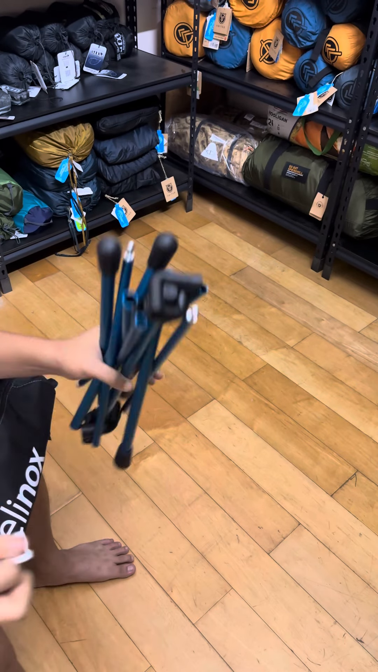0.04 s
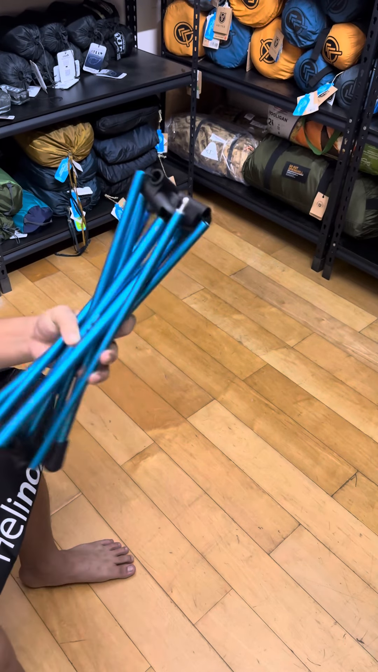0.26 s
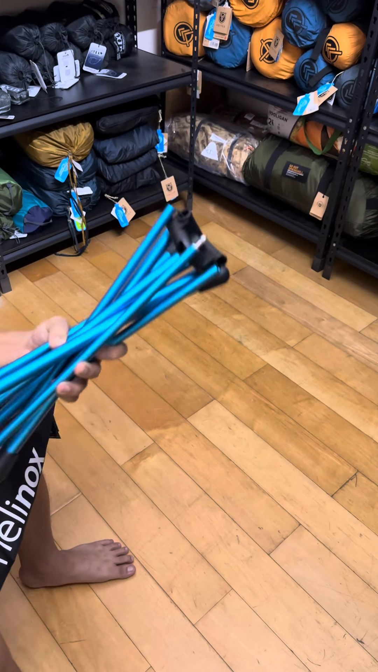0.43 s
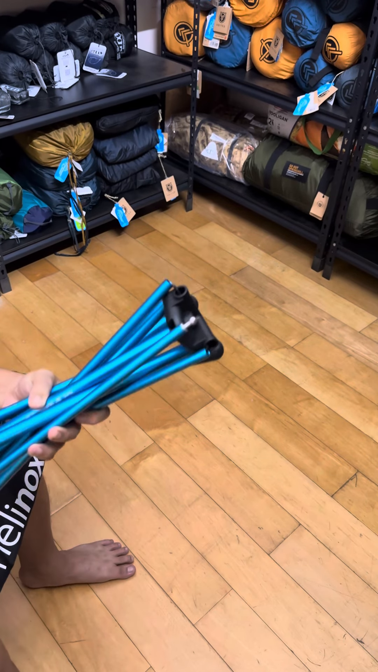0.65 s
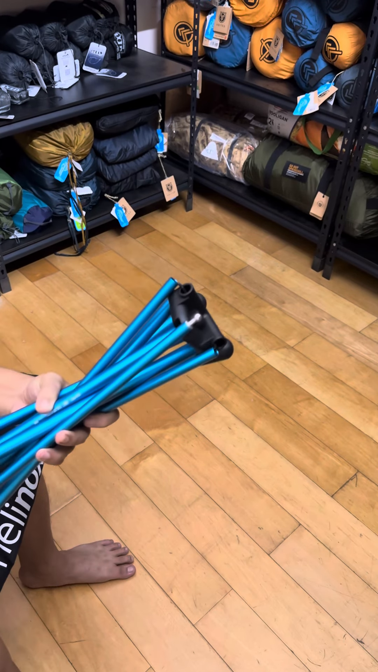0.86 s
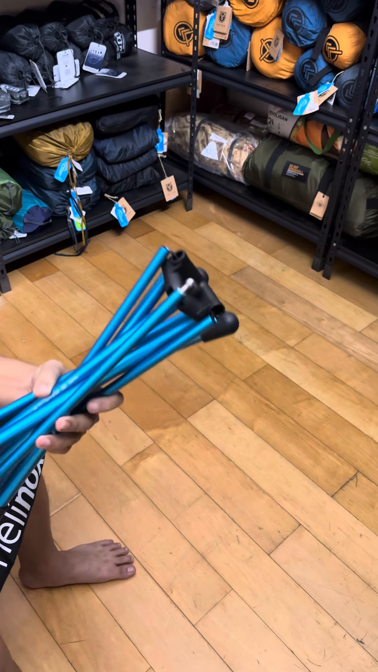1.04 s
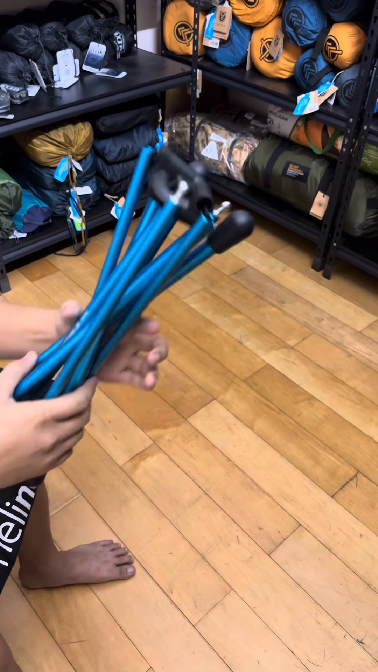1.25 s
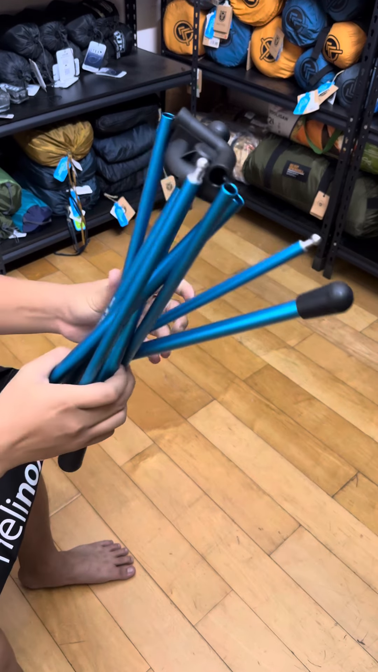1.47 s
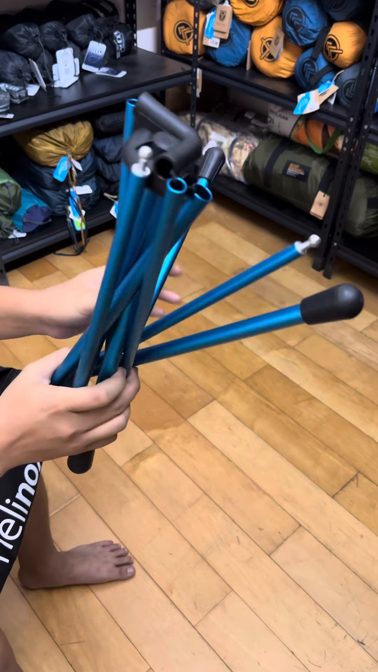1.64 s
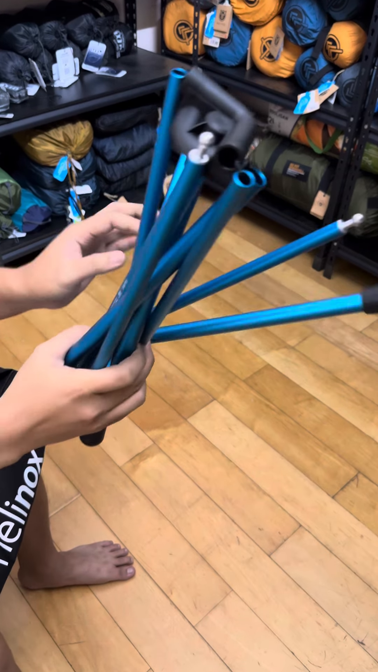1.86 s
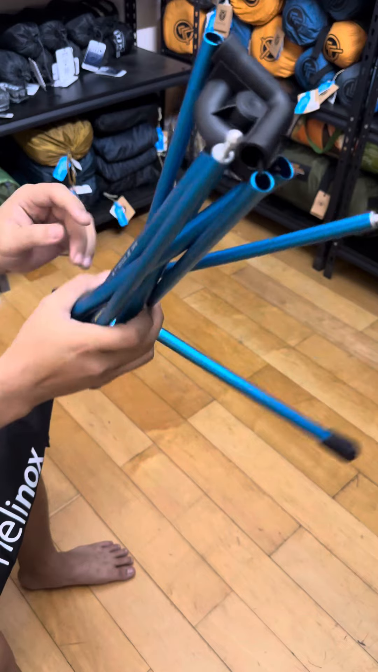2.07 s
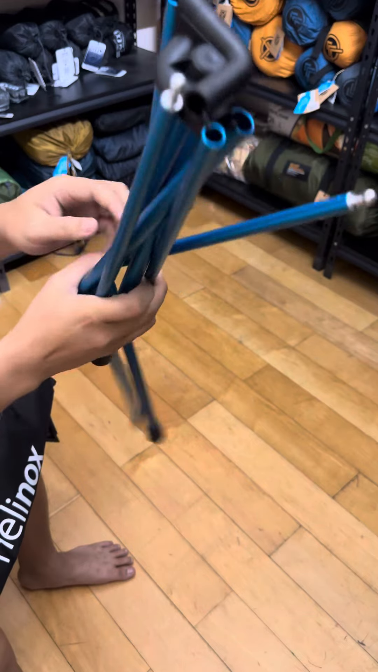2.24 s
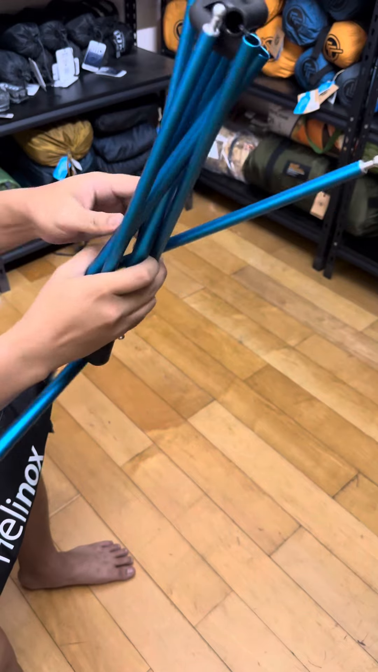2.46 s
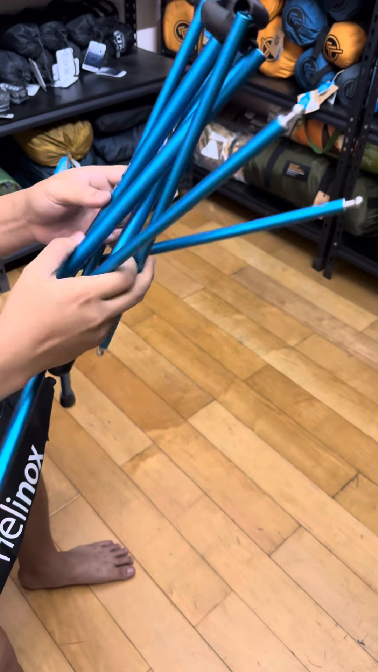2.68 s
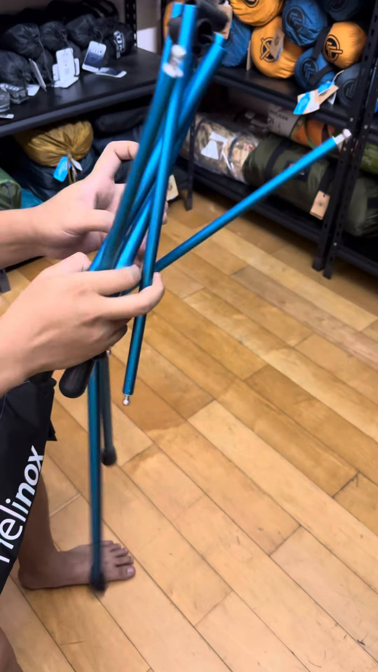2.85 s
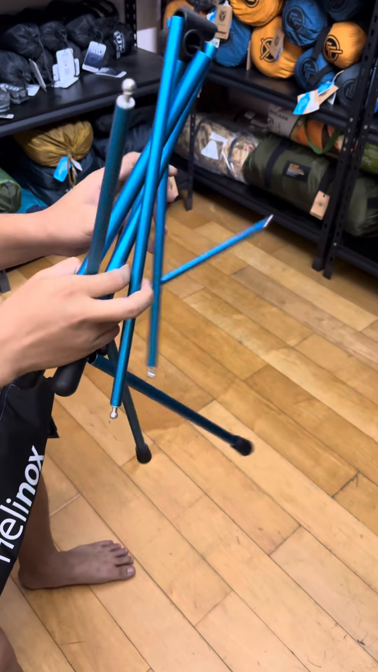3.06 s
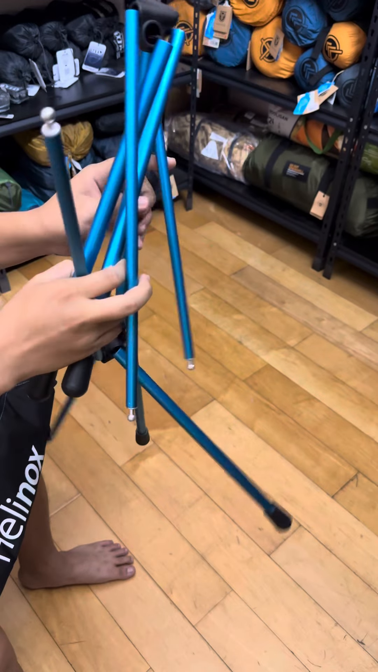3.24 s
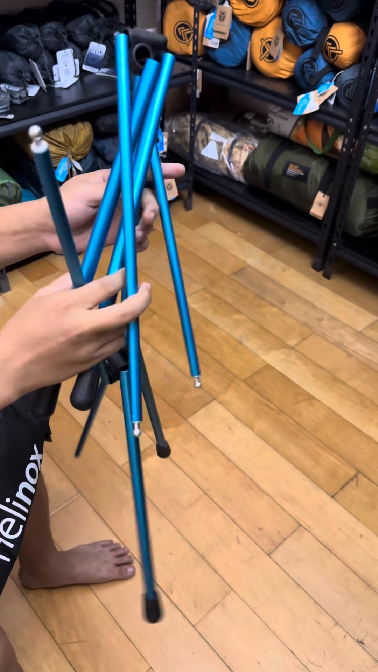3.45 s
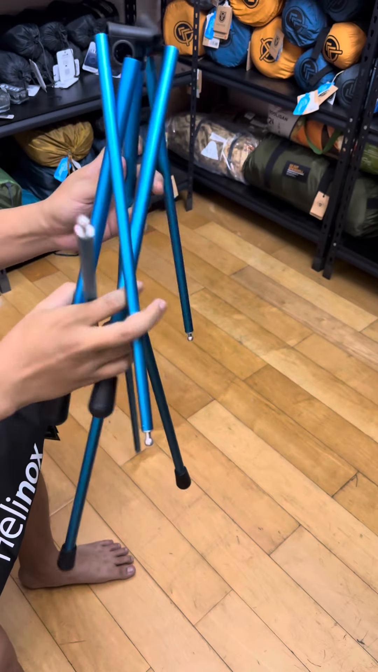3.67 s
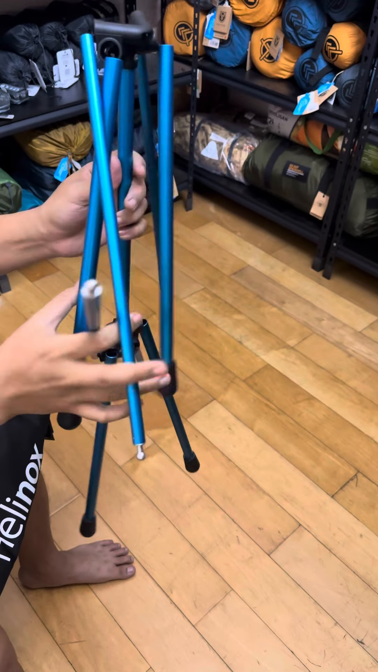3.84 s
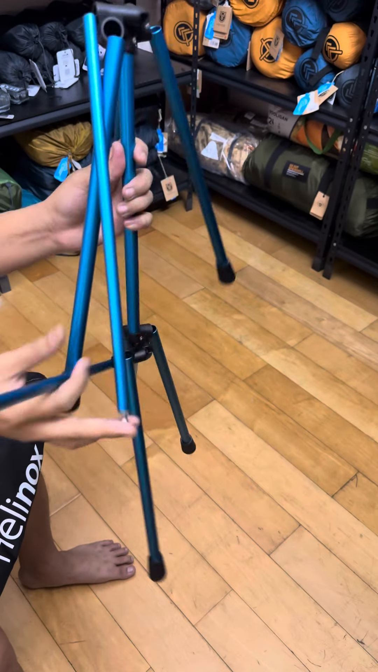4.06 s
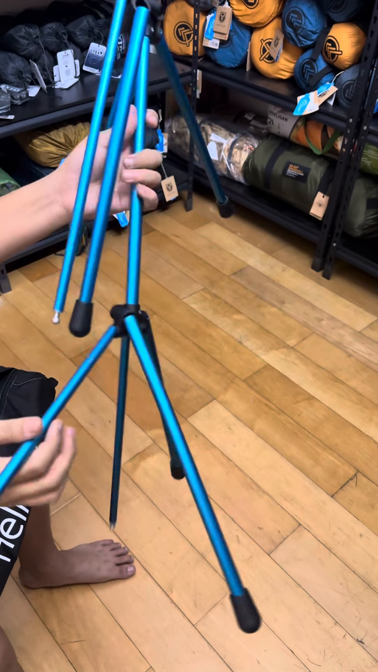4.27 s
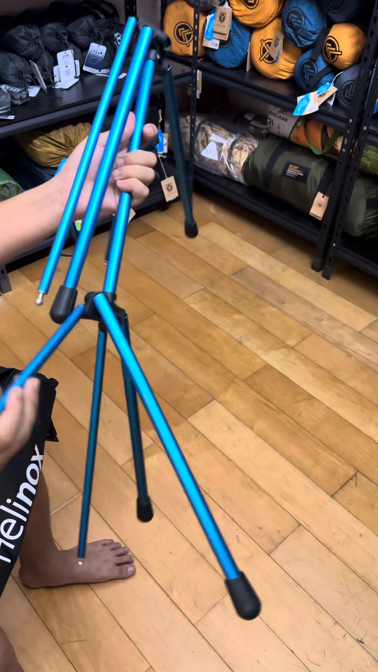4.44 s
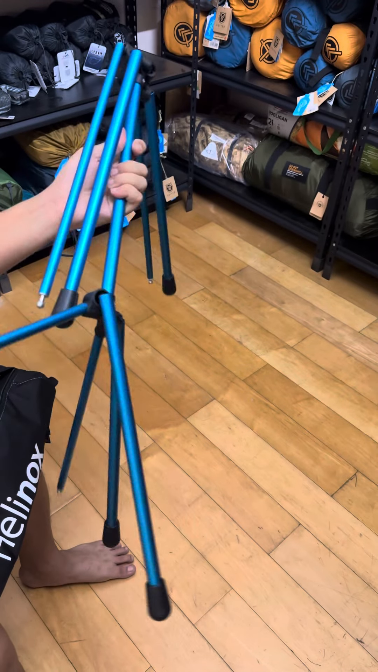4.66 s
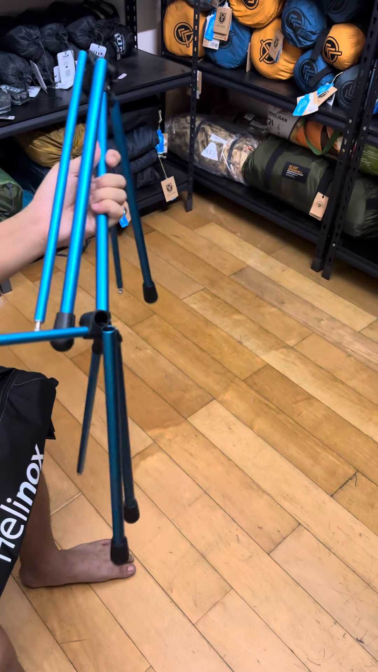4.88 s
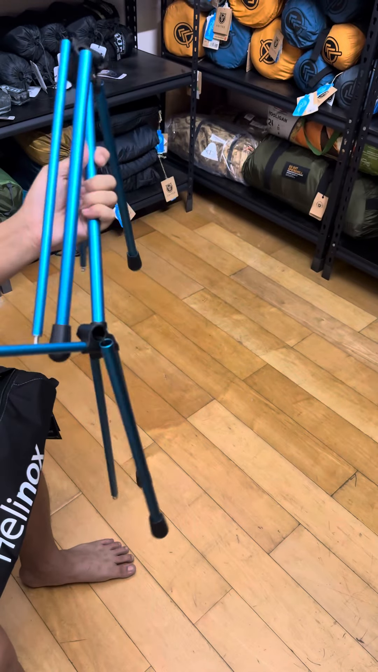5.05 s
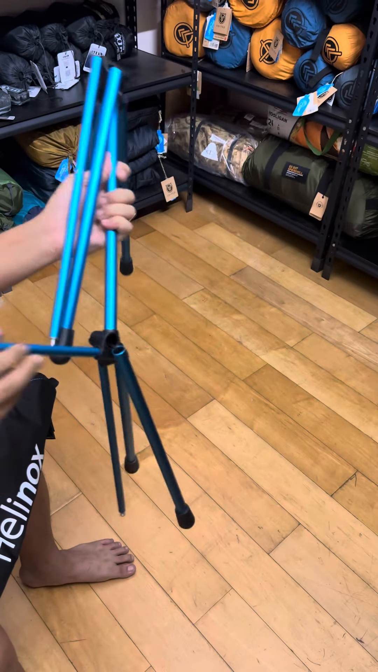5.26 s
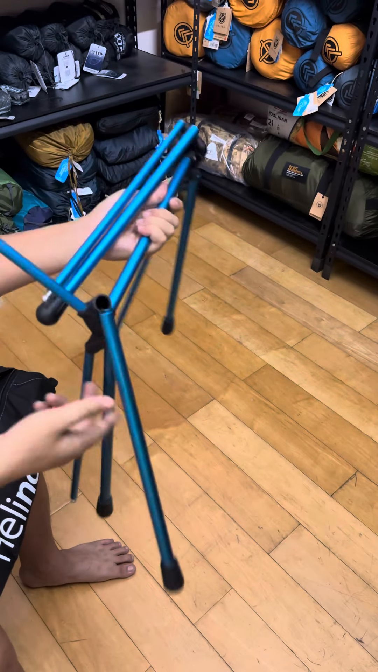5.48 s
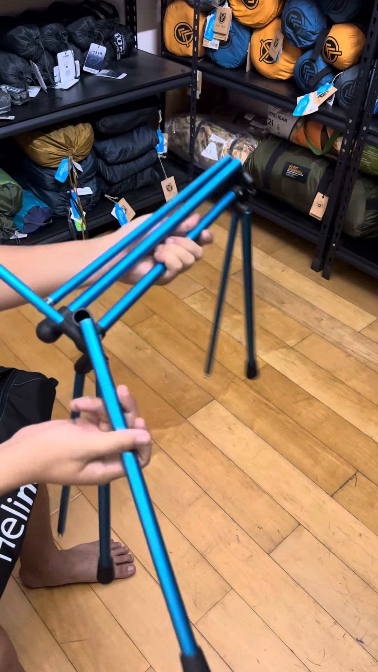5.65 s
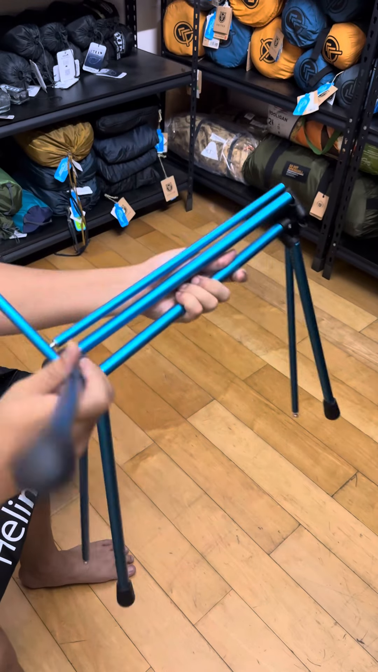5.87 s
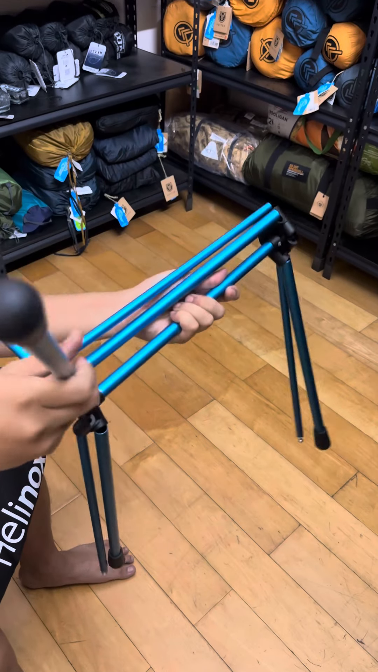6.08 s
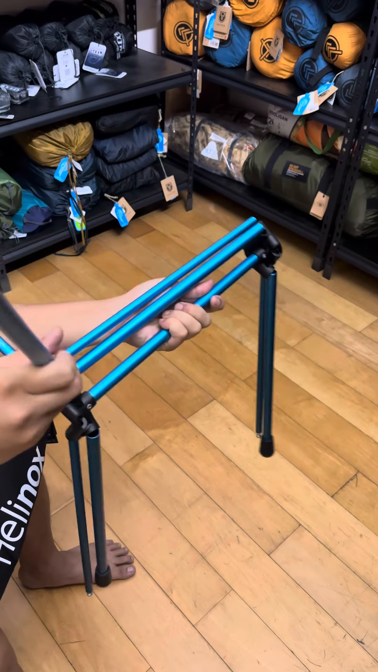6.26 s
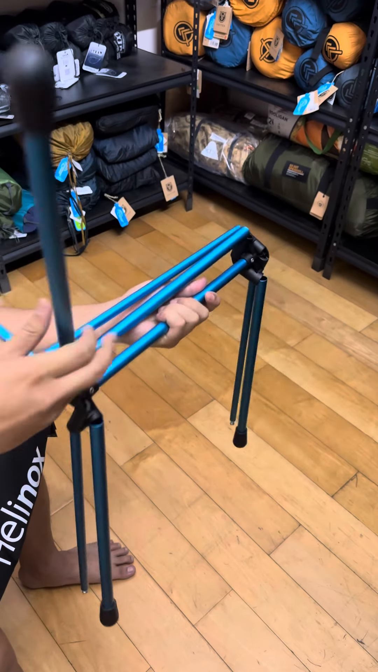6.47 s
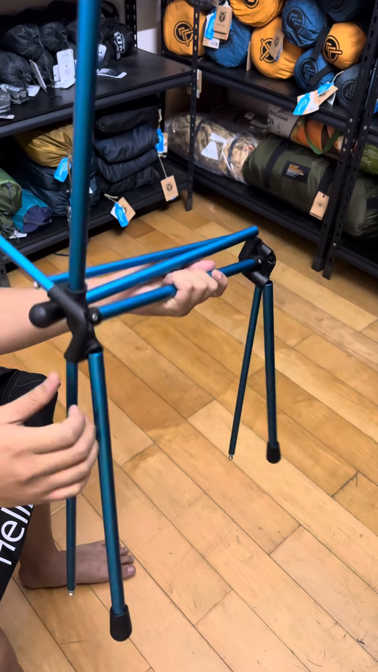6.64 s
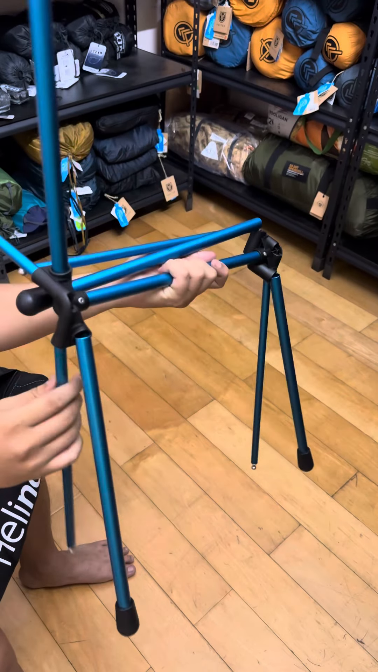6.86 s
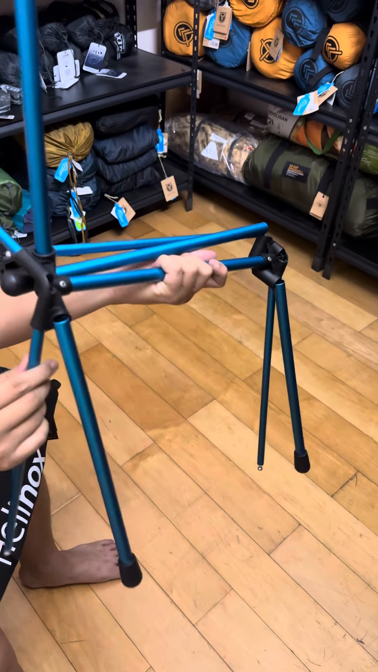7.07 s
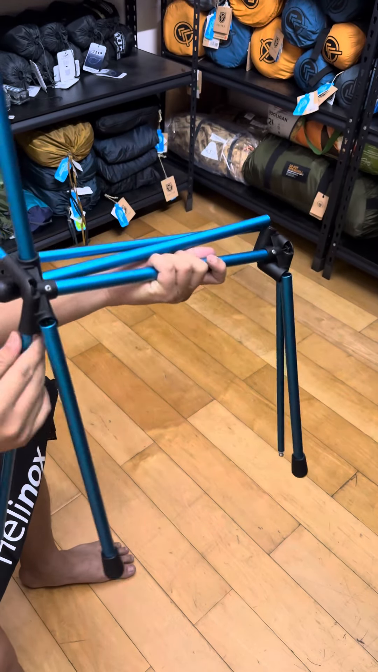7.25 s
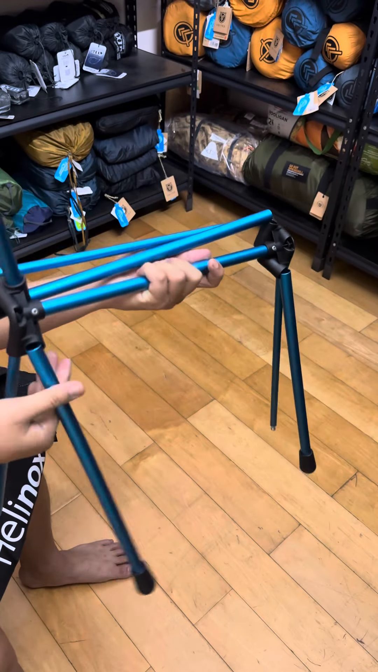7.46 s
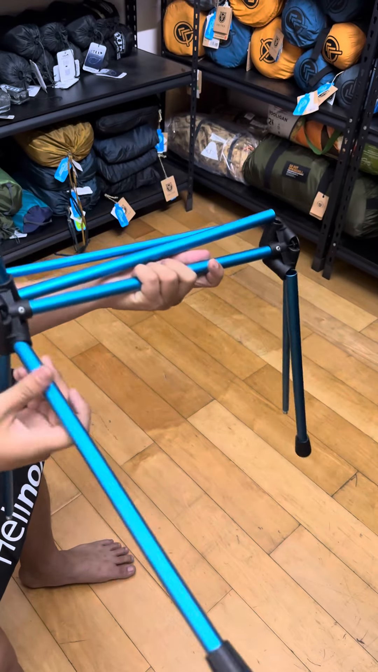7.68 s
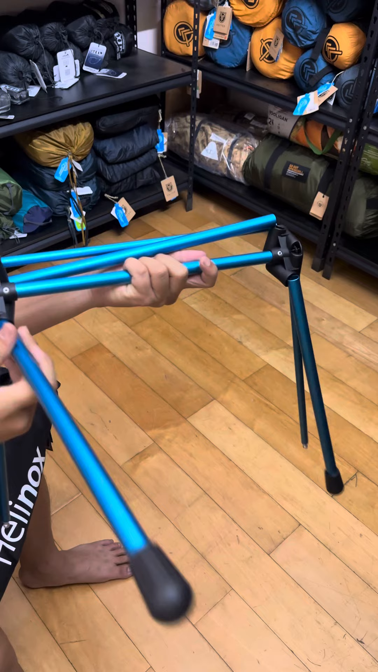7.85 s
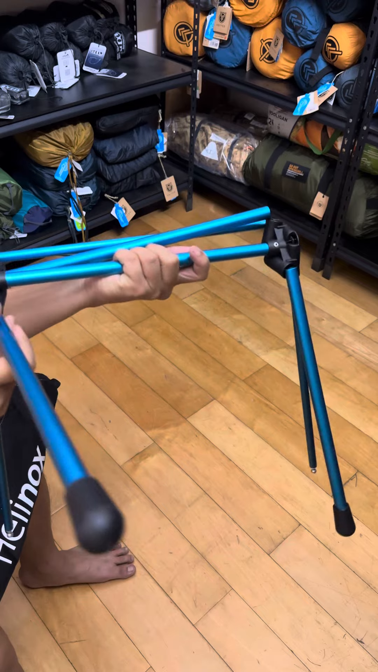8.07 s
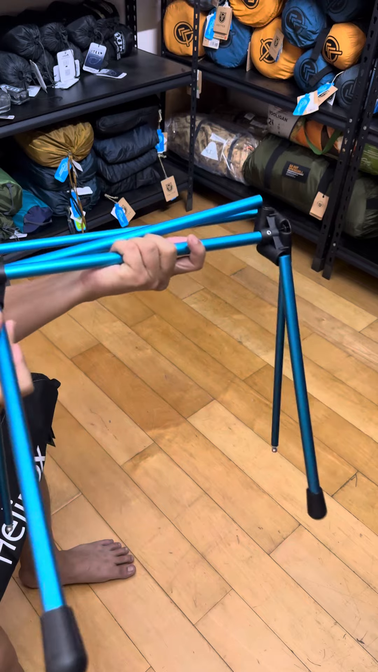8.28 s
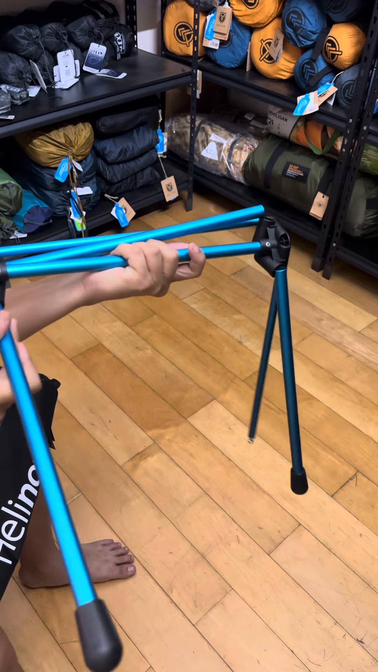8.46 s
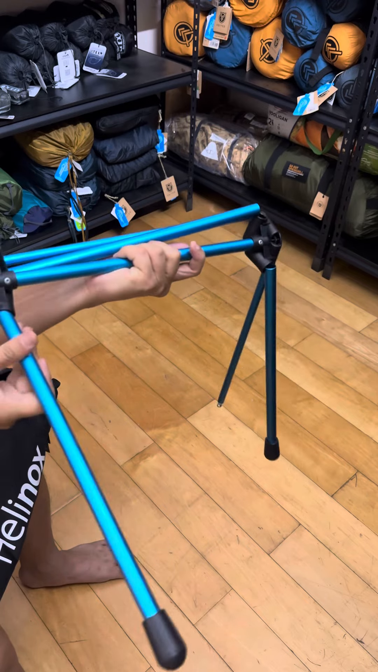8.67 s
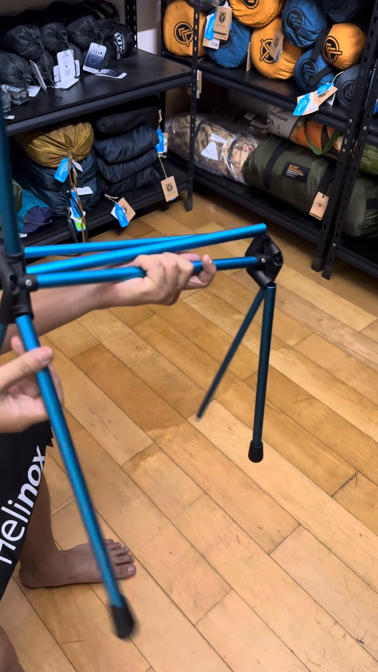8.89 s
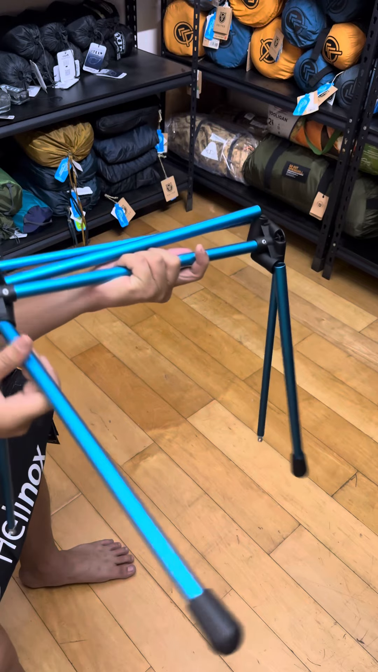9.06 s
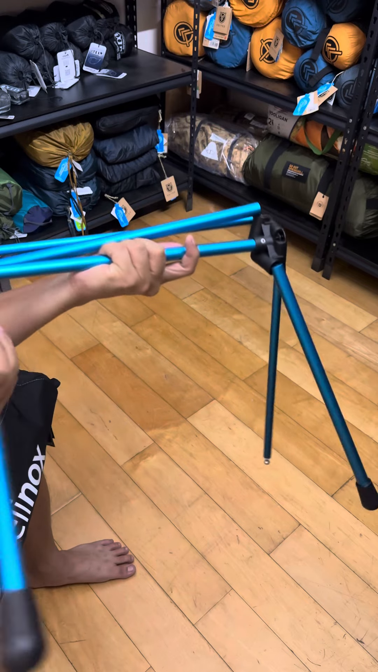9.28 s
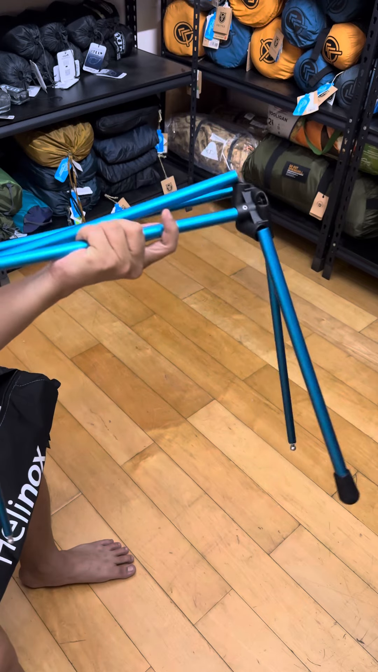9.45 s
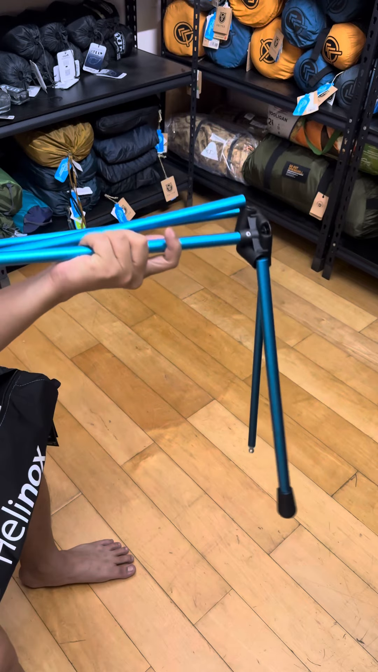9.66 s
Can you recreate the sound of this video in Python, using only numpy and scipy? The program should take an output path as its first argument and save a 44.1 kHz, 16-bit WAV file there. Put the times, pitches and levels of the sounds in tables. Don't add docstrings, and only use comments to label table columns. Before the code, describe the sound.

Dry, bright metallic clicks and clinks from a bundle of hollow poles, heard very near in a small room with short echoes. Busy rattling comes first, then isolated snaps, some preceded by a quick rising scrape of squeezed air. Skin and cord rub along the tubes between hits. Low ventilation noise and a distant engine sit beneath, and the ending is nearly quiet.

```python
import sys
import numpy as np
from scipy import signal
from scipy.fft import rfft, irfft, next_fast_len
from scipy.io import wavfile
from scipy.ndimage import uniform_filter1d

SR = 44100
rng = np.random.default_rng(int(sys.argv[2]) if len(sys.argv) > 2 else 0)


def to_wav(sig):
    pcm = np.clip(np.atleast_2d(sig), -1, 1) * 32767
    pcm = np.round(pcm).astype(np.int16)
    wavfile.write(sys.argv[1], SR, pcm.T)


def boost(x):
    u = np.asarray(x, float) / 20
    return 10 ** u


N = 428652

# (time [s], peak [dB], knock re peak [dB], edge re peak [dB], note [Hz])
SNAPS = [(1.1973, -14, -21, -2.5, 3900), (1.2238, -19.5, -16, -5, 5200), (1.2293, -18.5, -14, 0.5, 3600),
         (1.262, -21.5, -20, -26, 2710), (1.41, -20.5, -17, -10, 2610), (1.414, -20.5, -16.5, -16.5, 3380),
         (1.9298, -13.5, -16, -11.5, 3300), (1.931, -18.5, -18, -14.5, 2300),
         (1.9305, -20, -15, -11.5, 5000), (2.0516, -23.5, -12, -10.5, 3250),
         (2.122, -20.5, -20.5, -5.5, 6380), (2.163, -18, -18, -13, 2900),
         (2.5806, -21.5, -10.5, -1.5, 4800), (2.582, -22.5, -15.5, -6.5, 2500),
         (2.8541, -22.5, -10.5, -15, 6040), (2.855, -23, -9, -20, 2300), (2.9717, -7.5, -14, -15, 3200),
         (3.2817, -9.5, -11.5, -11, 1150), (3.283, -12.5, -21.5, -7, 3400), (4.0925, -29, -1.5, -2.5, 4600),
         (4.1728, -19.5, -8.5, -0.5, 4570), (4.1749, -20, -15, -7, 2300), (4.2281, -17.5, -19, -5, 3000),
         (5.1586, -13, -13, -9, 2980), (5.594, -24, -15, 0.5, 4430), (6.3565, -9, -13.5, -7, 5400),
         (6.3569, -8, -24, -9.5, 1450), (7.154, -28.5, 1, -3, 2170), (7.1971, -17, -7, -22, 2200),
         (8.2368, -7, -15, -12.5, 2560)]


def colour(x, table):
    size = next_fast_len(x.shape[-1])
    hz, db = np.transpose(table)
    bin_hz = np.arange(size // 2 + 1) * SR / size
    gain = boost(np.interp(np.log(bin_hz + 1), np.log(np.maximum(hz, 1)), db))
    return irfft(rfft(x, size) * gain, size)[..., :x.shape[-1]]


def band(x, lo_hz, hi_hz):
    return signal.sosfilt(signal.butter(2, [lo_hz, hi_hz], "bandpass", fs=SR, output="sos"), x)


def unit(x):
    return x / np.sqrt(np.mean(x ** 2))


def curve(table):
    s, *columns = np.transpose(table)
    return [np.interp(np.arange(N) / SR, s, c) for c in columns]


def walk(rate_hz):
    k = int(SR / rate_hz)
    steps = np.repeat(rng.standard_normal(N // k + 1), k)
    return 1.3 * uniform_filter1d(uniform_filter1d(steps, k), k)[:N]


def humps(start, end, top_db, rise, fall, floor_db):
    t = np.arange(0, N, 64)[:, None] / SR
    early = rise * np.maximum(start - t, 0)
    late = fall * np.maximum(t - end, 0)
    db = np.max(top_db - early - late, axis=1)
    return np.maximum(np.repeat(db, 64)[:N], floor_db)


def air():
    # (frequency [Hz], level [dB])
    vent_colour = [(25, -24.5), (42, -0.5), (100, 5), (160, -4.5), (250, -0.5), (410, -1.5), (500, -10),
                   (800, -12), (1300, -22.5), (2500, -26), (4000, -33), (6300, -50), (8500, -61.5),
                   (11000, -69.5)]
    # (frequency [Hz], level [dB])
    vent_side = [(60, -25.5), (110, -21), (200, -20.5), (380, -11.5), (700, -0.5), (1200, 0), (1750, -9),
                 (2600, 0.5), (3800, -3), (4700, 2), (8000, -6), (13000, 11.5)]
    # (time [s], level [dB])
    passes = [(.38, 6), (1.5, 4), (2.49, 3), (3.36, 3.5), (3.74, 6), (4.41, 4.5), (4.87, 4), (5.52, 3.5),
              (6.0, 7), (7.09, 5.5), (7.469, 3), (8.15, 6.5), (8.8, 4), (9.6, 1)]
    noise = colour(rng.standard_normal((2, N)), vent_colour)
    noise[1] = colour(noise[1], vent_side)
    noise = noise * boost(-45.5) / np.sqrt(np.mean(band(noise[0], 130, 10000) ** 2))
    s, db = np.transpose(passes)
    swell_db = humps(s, s, db, rise=40, fall=38, floor_db=-1.5)
    spectrum, hz, out = rfft(noise), np.arange(N // 2 + 1) * SR / N, 0
    split_hz = np.r_[0, 45 * 2 ** np.arange(0, 4.5, 1 / 3), SR]
    for lo, hi in zip(split_hz[:-1], split_hz[1:]):
        move_db = 1.4 * walk(4) + swell_db * (hi < 135)
        out = out + boost(move_db) * irfft(spectrum * ((hz >= lo) & (hz < hi)), N)
    return out


def drone():
    # (time [s], pitch [Hz], level [dB])
    engine = [
        (1.2, 80.24, -73),
        (1.596, 76.7, -46.5),
        (2.478, 80.2, -40.5),
        (2.618, 77.8, -44),
        (2.678, 80.0, -56),
        (2.848, 80.6, -46.5),
        (2.884, 80.1, -46),
        (2.934, 82.1, -48),
        (3.0, 85.2, -65),
    ]
    hz, db = curve(engine)
    t = np.arange(N) / SR
    fade = np.clip(np.minimum(t - engine[0][0], engine[-1][0] - t) / 0.13, 0, 1)
    hum = np.sin(2 * np.pi * np.cumsum(hz) / SR)
    return np.sqrt(2) * boost(db) * fade * hum * np.array([[1], [.06]])


def room(x):
    # (centre [Hz], time to fall 60 dB [s], level [dB])
    echo_bands = [(477, 0.35, -2.5), (980, 0.19, 3), (2010, 0.42, -7), (4000, 0.33, -1), (7800, 0.36, -1),
                  (13000, 0.14, -9.5)]
    t = np.arange(int(.7 * SR)) / SR
    tail = 0
    for hz, t60, db in echo_bands:
        noise = band(rng.standard_normal((2, len(t))), hz / 1.87, min(hz * 1.427, 18000))
        tail = tail + boost(db) * noise * 1000. ** (-t / t60)
    tail = tail * np.clip((t - .003) / 0.0013, 0, 1)
    return boost(-30.0) * signal.fftconvolve(x[:1], tail, axes=1)[:, :N]


def rubbing():
    # (time [s], level [dB])
    slips = [(1.19, -32.5), (1.35, -36), (2.09, -30), (2.54, -39), (2.79, -45.5), (2.95, -44.5),
             (3.3, -40.5), (4.17, -61.5), (5.17, -38.5), (6.36, -31), (7.17, -60), (8.39, -36), (9.04, -52)]
    # (time [s], level [dB])
    grip = [(0, -72.5), (1.1, -75.5), (1.5, -57), (1.95, -63), (2.3, -44.5), (2.8, -49), (3.6, -56),
            (4.25, -72), (4.55, -68), (4.75, -68.5), (5.0, -83), (5.4, -78.5), (6.1, -64), (6.66, -57),
            (6.8, -85.5), (7.3, -50.5), (7.85, -74), (9.72, -71)]
    # (start [s], end [s], level [dB])
    strokes = [(0.595, 0.723, -47.5), (1.084, 1.303, -48), (1.4, 1.81, -57), (1.962, 2.05, -48),
               (2.124, 2.164, -34.5), (2.73, 2.822, -43), (3.0, 3.45, -56), (3.515, 3.85, -50.5),
               (3.83, 4.105, -45.5), (4.2, 4.326, -45), (4.7, 4.74, -63), (5.06, 5.125, -75),
               (7.2, 7.3, -54), (7.66, 7.707, -57), (8.77, 8.826, -59), (9.3, 9.33, -77)]
    grains = rng.standard_normal((2, N)) * boost(3 * np.minimum(rng.exponential(size=(2, N)), 5))
    s, db = np.transpose(slips)
    rub_db = humps(s, s, db, rise=253, fall=171.5, floor_db=curve(grip)[0])
    skin = unit(band(grains, 1400, 7800)) * boost(rub_db - 6.5 + 2.3 * walk(25))
    noise = rng.standard_normal((2, N))
    hiss = unit(band(band(noise, 12700, 14200), 12700, 15800))
    hiss = hiss + .5 * unit(band(noise, 15000, 15800))
    hiss = hiss + 0.11 * unit(band(noise, 3600, 13000)) + 0.26 * unit(band(noise, 1200, 5500))
    stroke_db = humps(*np.transpose(strokes), rise=900.5, fall=205, floor_db=-92.0)
    return skin + hiss * boost(stroke_db + 2.7 * walk(60))


def squeak():
    part = np.clip((np.arange(N) / SR - 4.9775) / 0.0155, 0, 1)
    arch = np.sin(np.pi * part ** 1.4)
    phase = 2 * np.pi * np.cumsum(1900 + 1100 * arch) / SR
    note = np.sin(phase) + 0.17 * np.sin(2 * phase)
    return boost(-41.0) * np.sin(np.pi * part) ** .5 * note * np.array([[1], [.4]])


def slides():
    # (start [s], from [Hz], to [Hz], level [dB], swell power [-])
    slide_table = [
        (3.268, 890, 2460, -33, 1.5),
        (5.084, 1590, 3420, -51, 0.45),
        (5.57, 4000, 9000, -52, 1.1),
        (6.31, 2493, 5040, -52.5, 1.2),
        (7.122, 1043, 14960, -28.5, 0.95),
        (7.156, 1178, 1495, -41, 0.062),
        (8.168, 996, 3300, -34, 3.3),
    ]
    out = np.zeros((2, N))
    for start, from_hz, to_hz, db, swell in slide_table:
        end = min(row[0] for row in SNAPS if row[0] > start)
        i, part = int(start * SR), np.linspace(0, 1, int((end - start) * SR))
        hz = from_hz + (to_hz - from_hz) * part ** 1.2
        phase = 2 * np.pi * np.cumsum(hz) / SR
        rough = unit(band(rng.standard_normal((2, len(part))), 40, 350))
        scrape = unit(band(rng.standard_normal((2, len(part))), 1500, 11000))
        note = np.sin(phase) + .7 * (to_hz < 8000) * np.sin(2.0 * phase)
        out[:, i:i + len(part)] += boost(db) * part ** swell * (rough * note + 0.37 * scrape)
    return out


def ring(modes, t, strength, detune):
    hz, db, t60 = np.transpose(modes)[:, :, None]
    decay = np.exp(-np.log(1000) * t / t60)
    return np.sum(strength * boost(db) * np.sin(2 * np.pi * hz * detune * t) * decay, axis=0)


def leg():
    # (frequency [Hz], level [dB], time to fall 60 dB [s])
    leg_modes = [(544, -22.5, .15), (1082, -38, .12), (1590, -16.5, .1), (1612, -25, .13), (2126, -38, .1),
                 (3052, -33, .2), (3203, -31, .2), (4700, -40, .2)]
    out, i = np.zeros(N), int(2.2825 * SR)
    out[i:i + SR // 2] = ring(leg_modes, np.arange(SR // 2) / SR, 1, 1)
    return out * np.array([[1], [-.4]])


def chinks():
    # (time [s], note [Hz], level [dB])
    chink_table = [(1.1528, 14780, -15), (1.1978, 14500, -19.5), (1.2297, 14300, -15.5),
                   (5.1588, 14490, -16), (6.357, 14200, -16), (8.2372, 14500, -17), (1.93, 14500, -8),
                   (2.0516, 15000, -23.5), (2.117, 13600, -2), (2.618, 14900, -25), (2.734, 14700, -18.5),
                   (2.9715, 13400, -22), (3.283, 8700, -14.5), (3.2825, 14100, -14), (3.291, 8800, -17.5),
                   (4.0934, 8900, -21), (4.1735, 9200, -10), (4.1729, 14100, -12), (4.2282, 13500, -12),
                   (4.2282, 9330, -17), (5.595, 8500, -27), (8.9817, 8400, -30)]
    t = np.arange(9000) / SR
    out = np.zeros((4, N + len(t)))
    for s, hz, db in chink_table:
        i = int(s * SR)
        rough = unit(band(rng.standard_normal(len(t)), 30, 250))
        fade = np.exp(-t / 0.0031) + boost(-16.5) * rough * np.exp(-t / .025)
        chink = boost(db) * np.sin(2 * np.pi * hz * t) * fade
        out[:, i:i + len(t)] += chink * np.array([[1], [1], [0], [.4]])
    return out[:, :N]


def all_contacts():
    # (time [s], peak [dB], edge re peak [dB], note [Hz], ring [dB])
    clinks = [(1.1529, -17, -2.5, 3220, -16), (1.2534, -21, -9, 4900, -22.5),
              (1.3531, -29.5, -1, 4630, -21), (1.3612, -27, -7, 4460, -26),
              (2.1167, -20.5, -0.3, 5540, -11), (2.1338, -26, -10, 5700, -25),
              (2.2835, -17, -16.5, 1430, -14), (2.4055, -25, -3, 4120, -20), (2.618, -24.5, -7, 2920, -20),
              (2.734, -23, -8, 2900, -21), (2.7426, -24, -9.5, 2580, -13), (2.8216, -26, -11, 2440, -12),
              (2.9657, -10, -25, 1420, -16), (3.4105, -30, -5.5, 3520, -34), (3.9365, -33, -5, 3510, -12.5),
              (4.2824, -26, -2.5, 6350, -14), (5.1827, -41.5, -14, 2970, -4.5),
              (5.837, -38.5, -14, 1254, -30), (5.837, -37.5, -12.5, 2800, -25),
              (7.447, -43, -25.5, 2280, -9), (8.2419, -17, -13.5, 2400, -13.5),
              (8.2375, -14, -11.5, 4500, -21), (8.255, -19.5, -4, 1570, -13),
              (8.2601, -13.5, -10, 3100, -5), (8.2866, -19, -16, 3153, -3), (8.9818, -33, 6, 1900, -22),
              (8.9819, -32, -0.5, 3400, -20), (8.994, -31.5, -0.5, 6000, -25),
              (1.1526, -18.5, -5, 5200, -27), (1.1885, -29, 0.5, 5200, -25), (1.4384, -39, -10, 3500, -25),
              (5.606, -35.5, -3, 3320, -25), (2.9685, -12, -15, 2250, -6), (2.977, -16.5, -8.5, 6500, -5),
              (3.288, -19.5, -6, 515, -25), (3.292, -18, 0, 2780, -24), (3.304, -22.5, -6.5, 947, -26),
              (6.3598, -11.5, -9, 3860, -23), (6.3597, -12, -17.5, 2280, -25)]
    # (time [s], peak [dB], edge re peak [dB], note [Hz])
    ticks = [(1.1674, -34.5, 6, 6700), (1.541, -38, -34, 2820), (1.6835, -32.5, -6, 2520),
             (1.73, -35, -30, 3000), (2.0724, -29, -5, 3350), (2.08, -31.5, -3, 2510),
             (2.4411, -28, -5.5, 4950), (2.6428, -26.5, -15, 1600), (2.6778, -29, -25, 4750),
             (2.7753, -28.5, -35, 3620), (2.8694, -28, -3, 6700), (3.515, -37.5, -4.5, 1810),
             (3.833, -47.5, -4, 2750), (4.0213, -45, -11, 1430), (4.1856, -25.5, -3, 5950),
             (4.2323, -18, -11, 2990), (4.9823, -48, -9, 2830), (5.1597, -15, -41, 1600),
             (6.12, -43.5, -6, 3080), (6.213, -28, 0.5, 5410), (6.2906, -34, -10, 5850),
             (6.6357, -38.5, 1, 6160), (7.4191, -42, -20, 3000), (7.494, -39, -26, 2200),
             (7.5781, -46, -4, 2990), (7.6505, -39.5, -15.5, 3240), (8.71, -43.5, -23, 1210),
             (8.9616, -40, -12, 2700), (9.356, -46.5, -24, 1195), (9.5406, -48, -12.5, 1280)]
    # (time [s], peak [dB], note [Hz])
    creaks = [(2.427, -29, 2400), (2.542, -40, 3040), (4.479, -43, 2040), (4.727, -46.5, 2440),
              (4.8903, -52, 2590), (5.447, -44.5, 2620), (5.498, -53, 2490), (6.0496, -55, 2710),
              (6.153, -47, 2090), (7.5552, -48, 1360), (7.722, -48.5, 2970), (8.8382, -42.5, 2470),
              (8.902, -49, 2620), (9.183, -42, 2950), (9.4983, -44, 2900), (9.577, -44, 2560),
              (9.6357, -48, 2380), (9.686, -44.5, 2920)]
    held_ring_db, tick_ring_db, creak_ring_db = -25.5, -22.5, -14.5
    creak_knock_db, creak_edge_db, creak_crack_db = -6, -8, -11

    def knock_db(hz):
        return -10 + 2 * np.log2(hz / 3000)

    rows = [(*row, held_ring_db, 0) for row in SNAPS]
    rows += [(s, db, knock_db(hz), edge, hz, ring_db, 0) for s, db, edge, hz, ring_db in clinks]
    rows += [(s, db, knock_db(hz), edge, hz, tick_ring_db, 0) for s, db, edge, hz in ticks]
    rows += [(s, db, creak_knock_db, creak_edge_db, hz, creak_ring_db, creak_crack_db)
             for s, db, hz in creaks]
    return rows


def crackle(t, rise_s, last_s):
    shape = np.minimum(t / rise_s, 1) * np.exp(-t / last_s)
    spectrum = rfft(rng.standard_normal(shape.shape) * shape)
    burst = irfft(spectrum / np.abs(spectrum), len(t)) * np.sqrt(shape)
    return burst / np.sqrt(np.sum(burst ** 2, axis=1, keepdims=True) / (last_s[0] * SR))


def contacts():
    # (frequency [Hz], level [dB], time to fall 60 dB [s])
    tube_modes = [(1745, -9, .1), (2248, -5, .14), (2630, -10, .07), (3129, 1, .3), (3168, -2, .24),
                  (3279, -1, .24), (4170, -8, .1), (4760, -11, .09), (5455, -13, .06), (6530, -10, .07),
                  (8700, -20, .03), (11500, -20, .08), (13300, -12, .1), (14400, -14, .1)]
    # (frequency [Hz], level [dB])
    frame_colour = [(1050, -0.5), (1500, 2), (3100, -1), (3550, -4), (4150, -1.2), (5000, -2.5),
                    (6500, 2.5), (8000, 1.5)]
    body_hz, body_follows, body_octaves = 2900, .75, .6
    t, long_t = np.arange(2400) / SR, np.arange(9000) / SR
    body, knock, edge, notes = np.zeros((4, 4, N + len(long_t)))
    for s, peak_db, knock_db, edge_db, hz, ring_db, crack_db in all_contacts():
        i = int(s * SR)
        here, long_here = slice(i, i + len(t)), slice(i, i + len(long_t))
        hard_s = 0.00033 + 0.0013 * boost(peak_db + 15.5) ** .5
        last_s = boost(-crack_db) * hard_s * np.array([[1], [1], [4.5], [.15]])
        burst = boost(peak_db + crack_db) * crackle(t, 0.00037 * boost(-crack_db), last_s)
        burst[2:] *= boost(-.08 * (peak_db + 15.0))
        centre = body_hz * (hz / body_hz) ** body_follows
        limits = centre * 2 ** (body_octaves * np.array([-1, 1]))
        body[:, here] += band(band(burst, *limits), *limits)
        knock[:, here] += burst * boost(knock_db)
        edge[:, here] += burst * boost(edge_db)
        toward = rng.choice([-1, 1])
        click = boost(peak_db + 2.0) * np.sin(2 * np.pi * hz * t) * np.exp(-t / 0.0024)
        notes[:, here] += click * np.array([[1], [.6 * toward], [.3], [.27]])
        chance = rng.standard_normal((2, len(tube_modes), 1))
        tube = ring(tube_modes, long_t, boost(2.5 * chance[0]), 1 + .002 * chance[1])
        tube = boost(1.206 * peak_db - 5.0 + ring_db) * tube
        notes[:, long_here] += tube * np.array([[1], [.5 * toward], [.5], [.5]])
    knock = band(knock, 650, 2100)
    edge, top = band(edge, 5000, 10000), band(edge, 11000, 16000)
    crack = boost(9.5) * body + boost(10.0) * knock + boost(10.5) * edge + boost(5.5) * top
    return (colour(crack, frame_colour) + notes)[:, :N]


def scene():
    # (frequency [Hz], level [dB])
    port_sum = [(200, -7), (6000, -2.5), (8500, -6), (9800, -8.5), (10500, -13.5), (12700, -17.5),
                (13600, -14), (15700, -13.5), (16900, -52)]
    port_diff = [(200, -20.5), (500, -10.5), (1200, -10), (1800, -18), (2600, -6.5), (5000, -5),
                 (8000, -6.5), (12000, 3.5), (13200, -4.5), (15600, -2), (16900, -37.5)]
    hits = contacts() + chinks()
    tap = leg()
    handling = slides() + squeak() + rubbing()
    shiver = boost(-2.5) * np.array([hits[2], np.roll(hits[2], 37)])
    to_walls = hits[3:] + 0.49 * hits[2:3] + 0.48 * tap[:1] + handling[:1]
    near = hits[:2] + shiver + tap + handling + room(to_walls)
    ports = np.array([colour(near[0], port_sum), colour(near[1], port_diff)])
    mid, side = ports + air() + drone()
    return np.array([boost(1.19) * (mid + side), boost(1.0) * (mid - side)])


def band_limit(x):
    return signal.sosfilt(signal.butter(12, 16990, fs=SR, output="sos"), x)


def record(dry):
    loudness = uniform_filter1d(np.abs(dry).max(axis=0), 400, origin=150)
    over = np.maximum(loudness / boost(-20.5), 1)
    fall = 1 / (0.12 * SR)
    dip_db = signal.lfilter([fall], [1, fall - 1], -9 * np.log10(over))
    rounded = np.tanh(1.023 * dry * boost(dip_db)) / 1.272
    limits = signal.butter(6, [36, 16400], "bandpass", fs=SR, output="sos")
    return band_limit(signal.sosfilt(limits, rounded))


dry = scene()
out = record(dry)
to_wav(out)
```